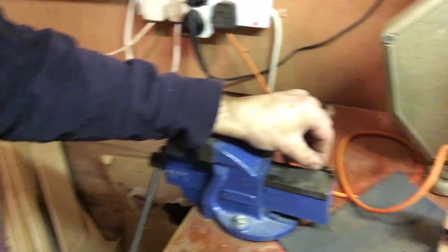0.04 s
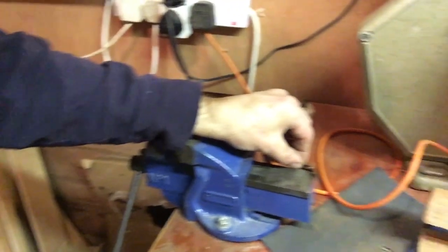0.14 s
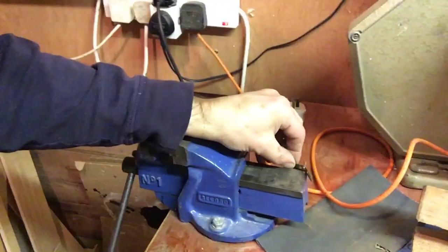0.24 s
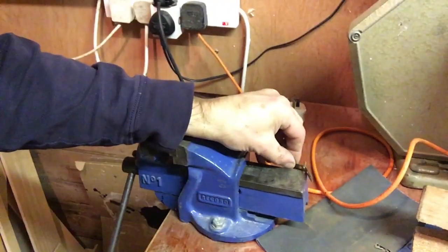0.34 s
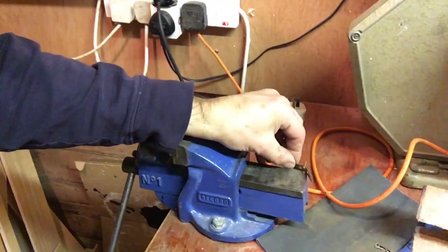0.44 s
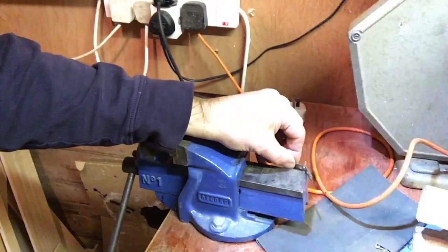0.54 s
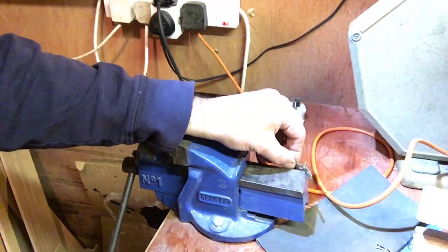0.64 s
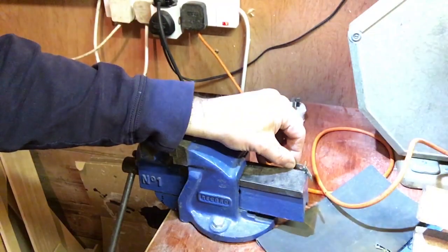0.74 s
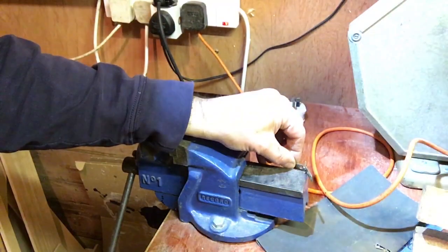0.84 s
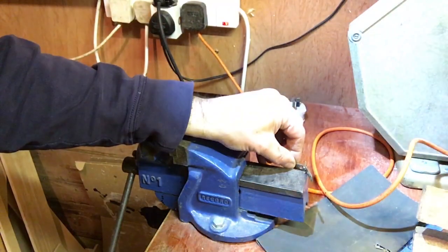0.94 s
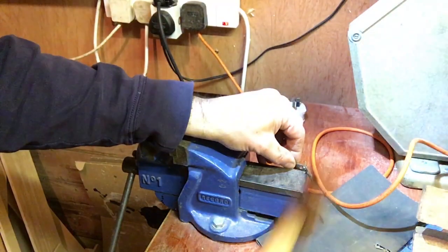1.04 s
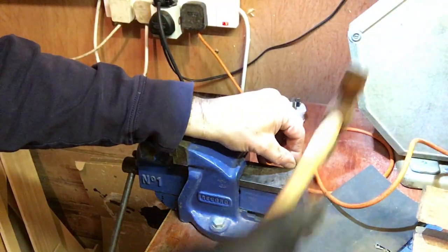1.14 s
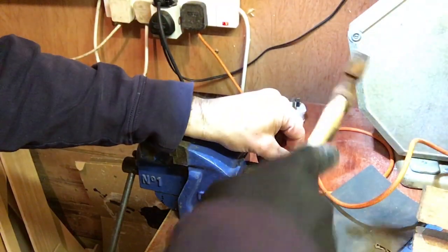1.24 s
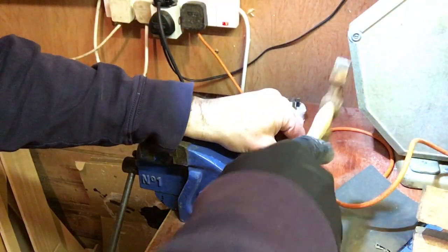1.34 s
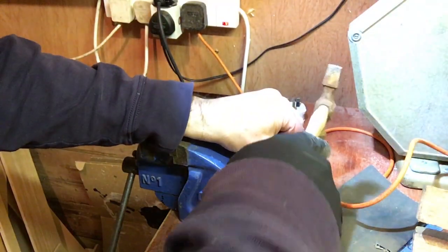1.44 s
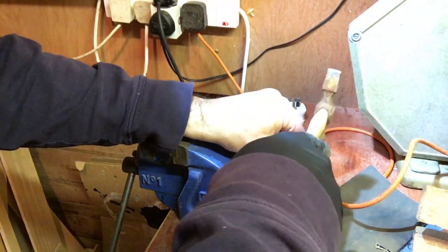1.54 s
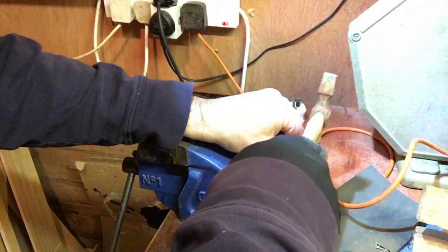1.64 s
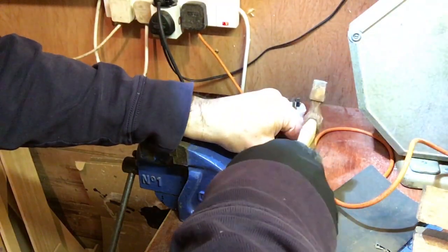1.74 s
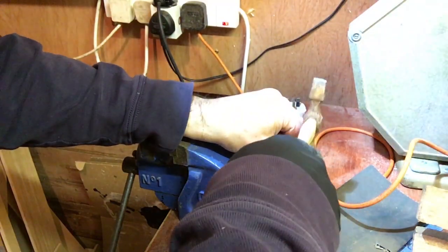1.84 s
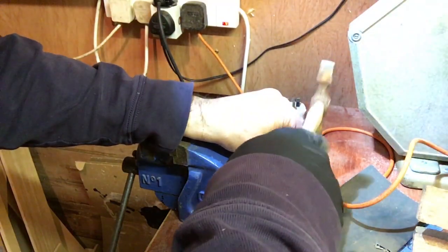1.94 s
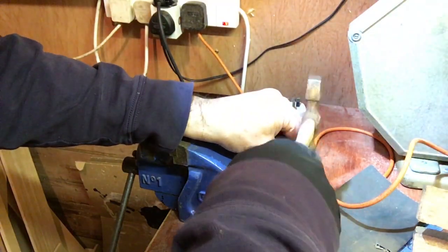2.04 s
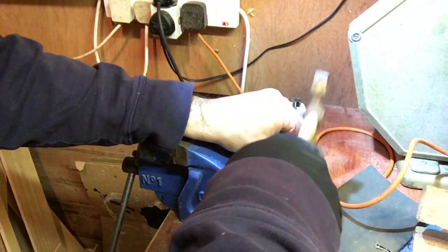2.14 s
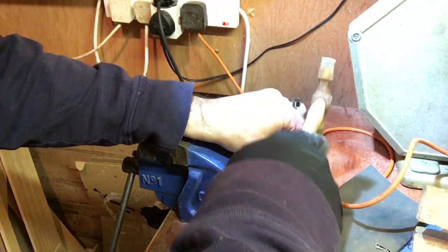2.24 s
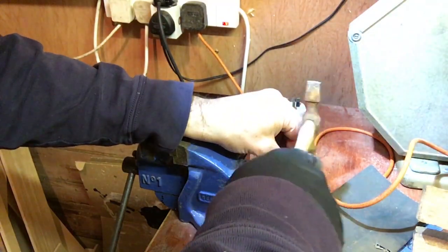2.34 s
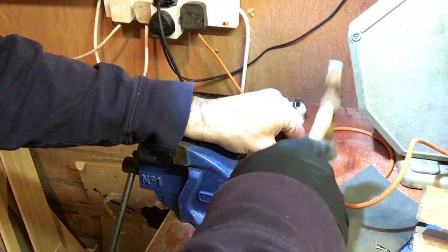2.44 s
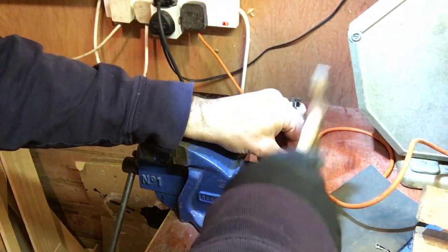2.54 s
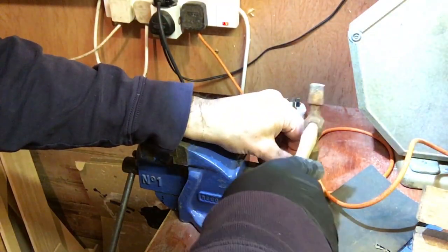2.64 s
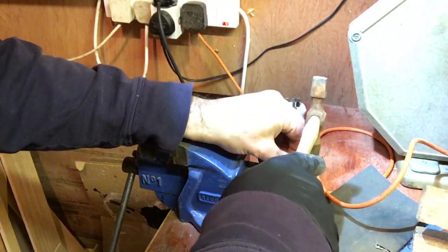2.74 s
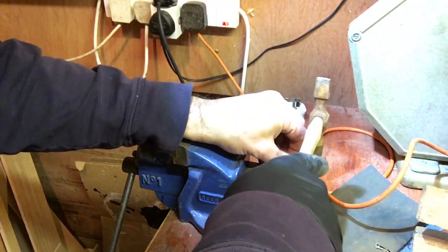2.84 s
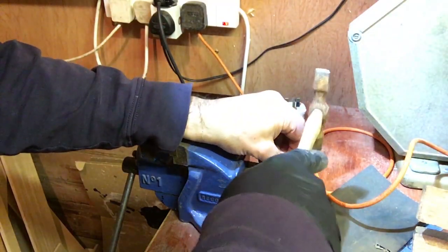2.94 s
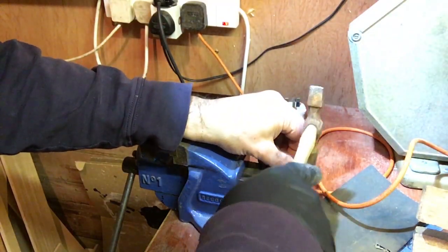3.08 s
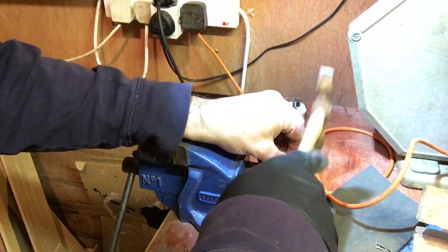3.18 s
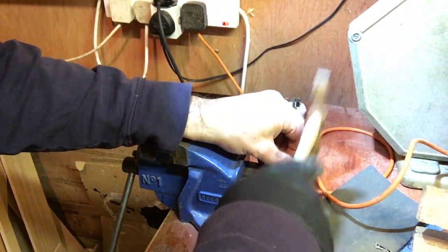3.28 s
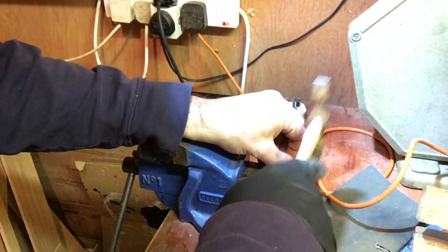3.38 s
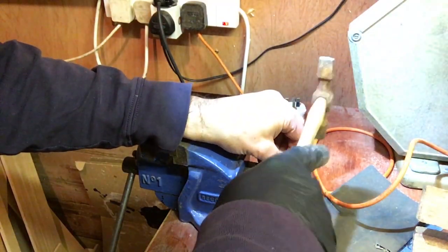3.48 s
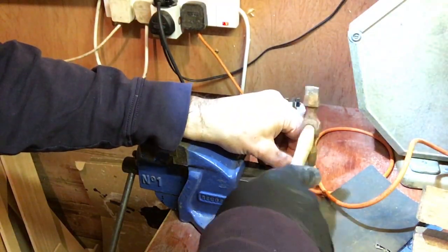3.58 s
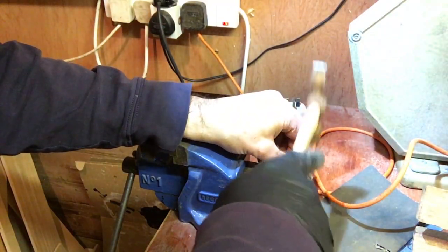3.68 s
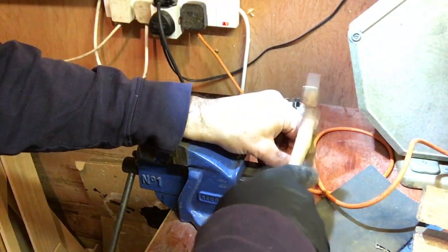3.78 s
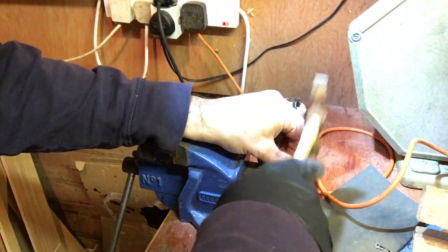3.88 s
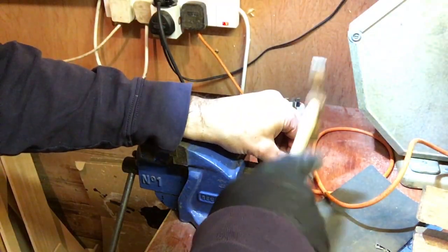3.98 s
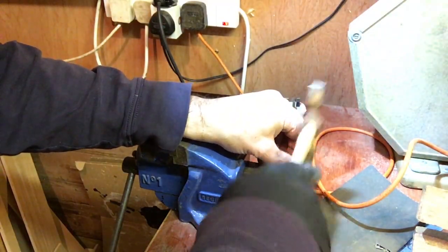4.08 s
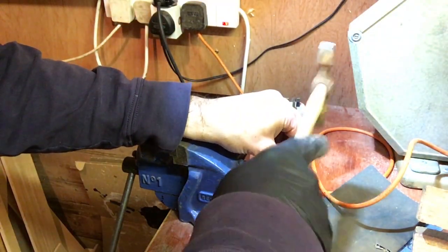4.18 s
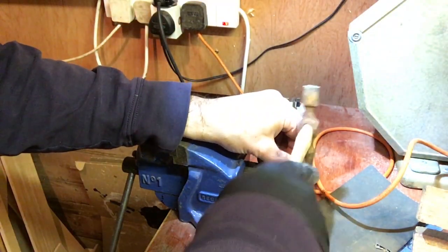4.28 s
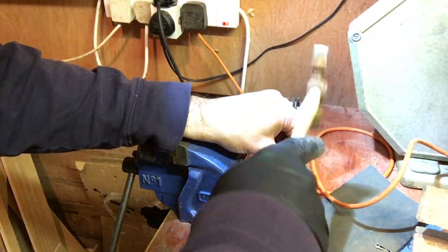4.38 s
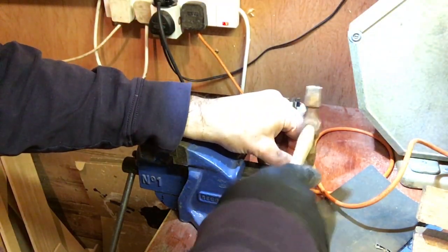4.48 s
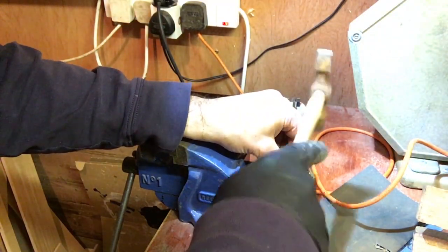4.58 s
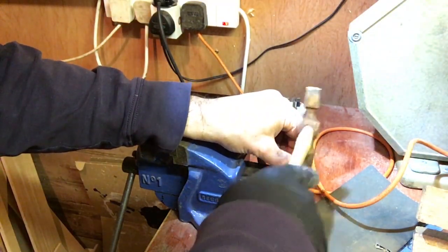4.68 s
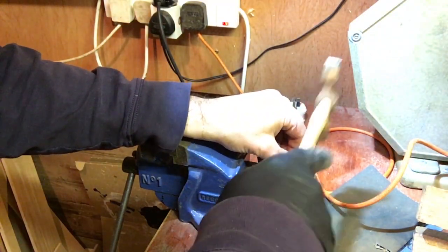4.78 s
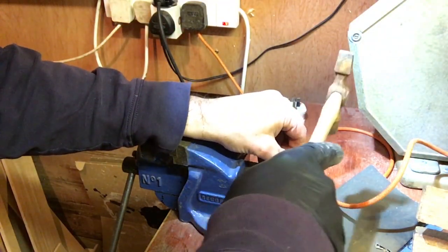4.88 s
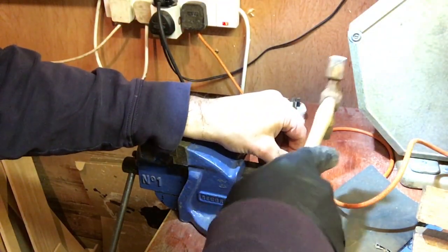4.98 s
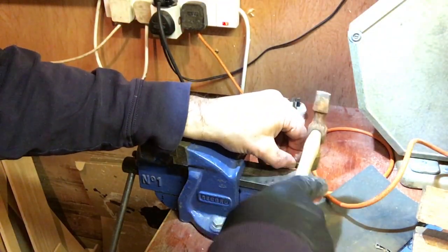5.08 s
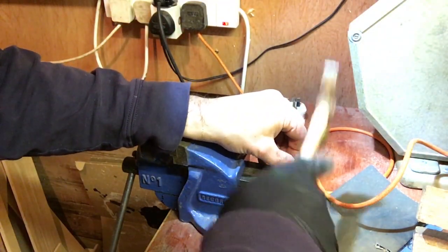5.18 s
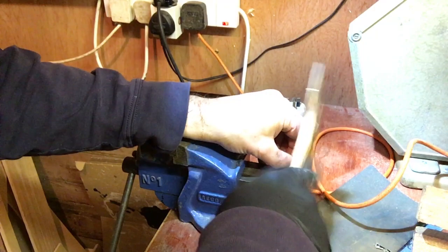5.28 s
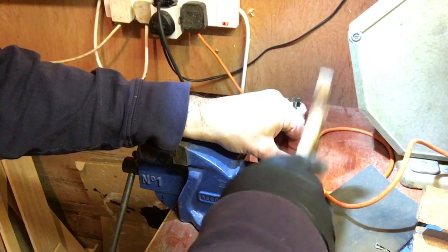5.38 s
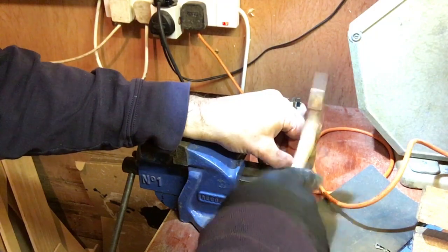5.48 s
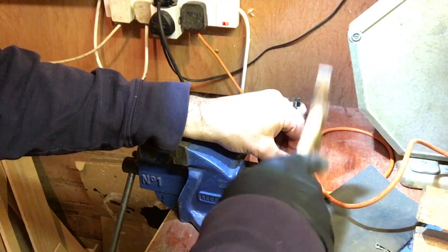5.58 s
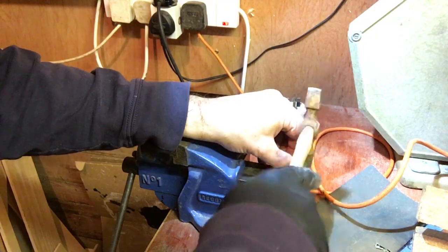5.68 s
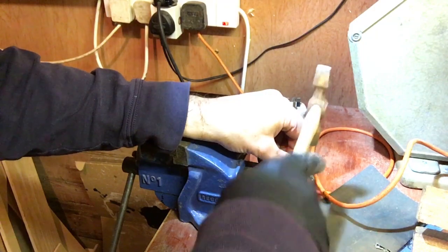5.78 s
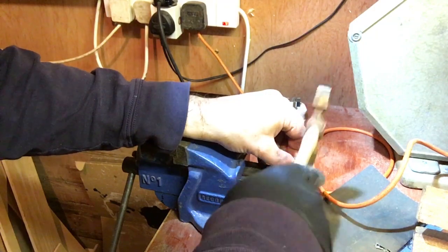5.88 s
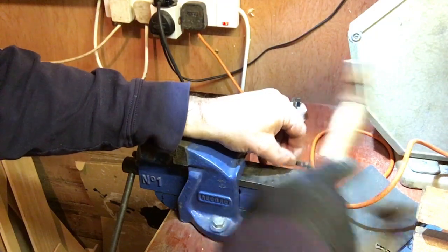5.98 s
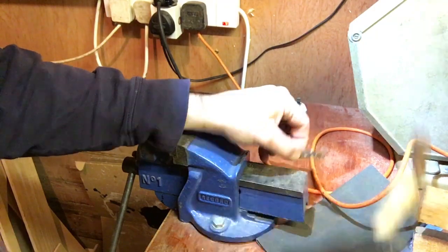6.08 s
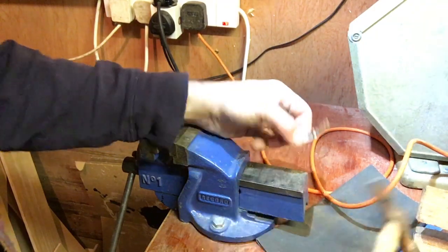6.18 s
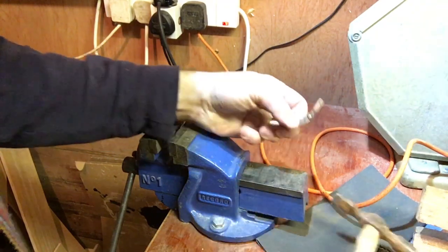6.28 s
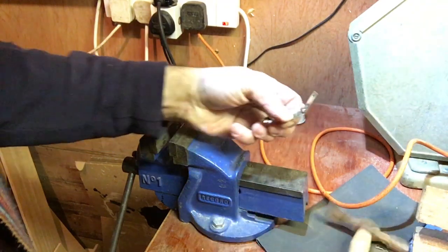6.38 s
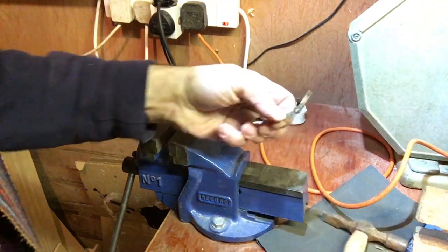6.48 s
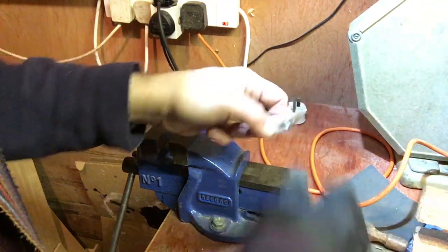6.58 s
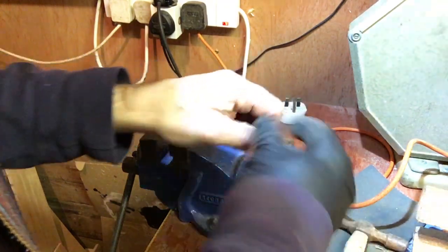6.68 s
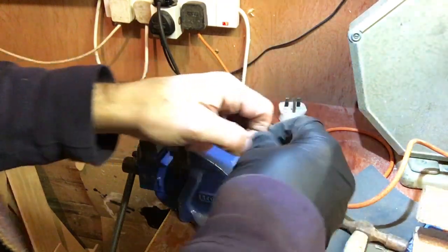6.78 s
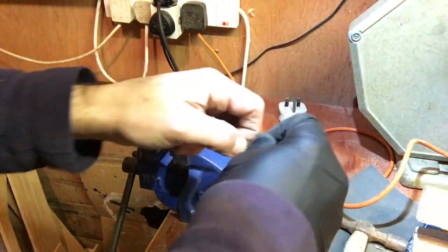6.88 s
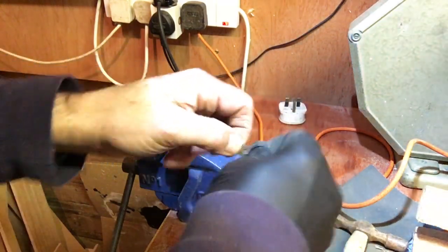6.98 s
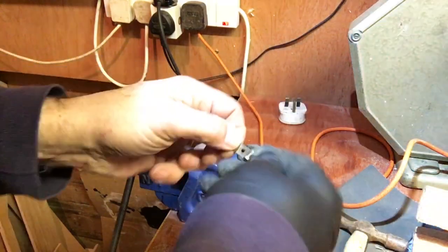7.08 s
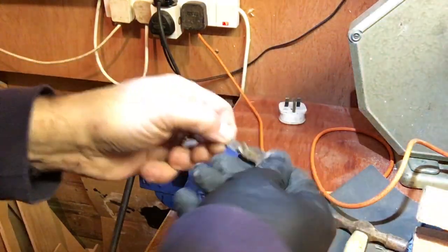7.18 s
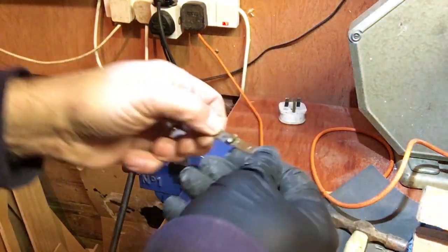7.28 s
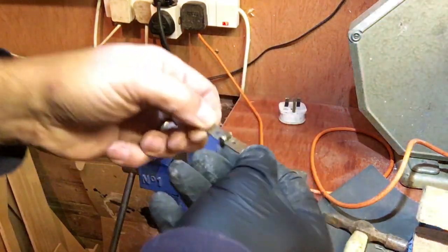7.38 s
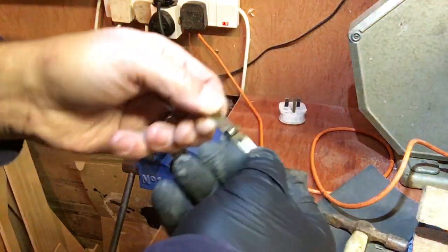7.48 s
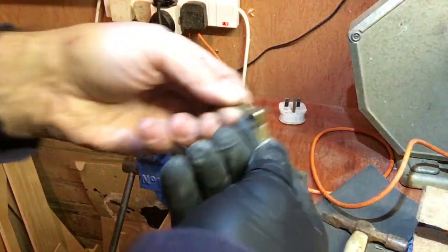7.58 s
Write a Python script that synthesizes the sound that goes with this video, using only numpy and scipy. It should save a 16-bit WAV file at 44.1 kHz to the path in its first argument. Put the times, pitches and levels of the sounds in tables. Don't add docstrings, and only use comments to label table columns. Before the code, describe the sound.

A small workshop heard close up, with a quiet low rumble and thin hiss throughout. From 0 to 1.6 s only soft sleeve and glove rustle, with a small loose tick at 1.2 s. A very light tap at 1.7 s begins the hammering on a brass pin in a cast vise: uneven, moderate taps to about 3.1 s, a couple with a brighter brassy tick, then loud blows from 3.3 s, four or five a second, with a short gap before 5.1 s and the last at 5.85 s. Each is a hard, dry mid-pitched clank with short ring, woody bench body, low leg thump and tight room reflection, loudest ones squashed. At 6.4 s the dropped hammer knocks on the bench, bounces, rattles and hisses to rest by 6.6 s. Faint rustle, bright ticks and a soft low knock continue to 7.6 s.

```python
import sys
import numpy as np
from scipy import signal
from scipy.io import wavfile
from scipy.ndimage import uniform_filter1d

SR = 44100
rng = np.random.default_rng(int(sys.argv[2]) if len(sys.argv) > 2 else 0)


def natural_amplitude(level_db):
    exponent = np.asarray(level_db, float) / 20
    return 10 ** exponent


def to_wav(s):
    ch = np.atleast_2d(s).T
    pcm = np.round(np.clip(ch, -1, 1) * 32767)
    wavfile.write(sys.argv[1], SR, pcm.astype(np.int16))


N = 336232

TAPS = [(1.727, -23.5, -35, -33.5, -69), (2.04, -8.5, -15, -30.5, -45.5), (2.306, -13, -20, -40, -50.5),
        (2.564, -17.5, -13, -15, -31.5), (3.042, -18.5, -20, -15, -27), (3.297, -5, -19.5, -35, -45),
        (3.545, 2, -17.5, -28.5, -36.5), (3.779, 2.5, -13.5, -27.5, -45), (4.009, 3, -13.5, -29, -38.5),
        (4.226, 1.5, -11.5, -22.5, -38), (4.438, 2, -13, -23.5, -44), (4.628, -4.5, -12, -24.5, -34),
        (5.096, -4, -17, -28.5, -37), (5.316, 3.5, -14, -24, -49.5), (5.507, 2, -10.5, -19, -37),
        (5.688, 0.5, -9, -17, -37.5), (5.843, -1, -10.5, -17.5, -38)]
BOUNCES = [
    (6.375, -10.5, 1.5, -21, -26),
    (6.436, 5.5, -15.5, -19.5, -37.5),
    (6.515, -12.5, -3.5, -14, -23.5),
    (6.553, -18.5, -2, -1, -44),
    (6.585, -14, -5, -19, -54),
    (6.595, -23, -26, -7, -67),
]
# [t/s, peak level/dB, low edge f/Hz, high edge f/Hz]
TICKS = [
    (1.228, -38.5, 900, 7040),
    (6.298, -52.5, 250, 445),
    (6.373, -28, 5000, 24000),
    (6.53, -49, 4630, 10190),
    (6.716, -46, 900, 2590),
    (6.833, -38.5, 4200, 8100),
    (6.993, -48, 4800, 7600),
    (7.483, -53.5, 2200, 3880),
    (7.537, -39.5, 250, 1300),
]
COLOUR_HZ = [400, 1300, 2900, 5800, 13000]
# thud, body, clank, tick, ping [level/dB]
USUAL_COLOUR_DB = [-13, 0.5, -15, -21, -45.5]

VISE_ON_PLANK_MODES = [(252, -3.5, .29), (236, -12, .2),
                       (177, -9, 0.073), (285.5, -10, 0.16), (314, -9, 0.14), (384, -8.5, .13), (445.2, -4.5, 0.2),
              (641, -4.5, .16), (661, -11.5, 0.17), (701.7, -9.5, .1), (780, -3, 0.092), (1000, -4, 0.1),
              (1004.4, -6, .12), (1020, 2, 0.02),
                       (1200, -7, 0.11), (1210, -9, 0.025), (1439, -8.5, .1), (1367, -5, .12), (1465, -7.5, 0.071),
               (2077, -17.5, 0.24), (2430, -15.5, .1), (2830, -19, 0.027), (1500, -11, 0.063),
               (1830, -15.5, 0.067), (3175, -12.5, 0.096), (3780, -17.5, .1)]
JAW_MODES = [(2890, -7, .05), (2950, -3, .085), (3015, -5, .06), (3130, -5, .035), (3280, -5, .03)]
HEAD_MODES = [(4300, -24, .03), (4810, -23, .055), (5500, -28, .035), (5900, -24, .04), (6330, -23, .04),
              (6880, -31, .09), (7050, -32, .06), (8160, -38, .04), (11650, -41, .03), (12570, -39, .04),
              (13800, -41, .05), (14900, -44, .03)]
BENCH_MODES = [(350.7, -4, 0.07), (607, -6, 0.11), (790, -4, 0.057), (938, -11, 0.15), (1046, -10.5, 0.14),
               (1180, -12.5, 0.038), (1430, -0.5, 0.1), (1663, -4, 0.019), (2156, -1, 0.029),
               (2240, -8.5, .04), (2720, -8, 0.021), (2870, -16, 0.056), (3970, -18.5, .035),
               (4570, -14, .035), (6300, -17, 0.023)]
LEG_MODES = [(68.6, -12.5, 0.18), (83, -5, 0.1), (111.2, -5, .22), (141, -10.5, 0.084), (151.85, -8, 0.047)]
CASE_MODES = [(377, -58, .9), (614, -66, 1.5), (905, -64, .7), (940, -60, .8), (968, -62, .7),
              (1010, -63, .8), (1050, -65, .6), (1104, -70, 1.4)]

# [f/Hz, level/dB per Hz]
ANSWER = [(41, -38.5), (70, -15.5), (190, -15.5), (244, -6), (853, -2), (1370, 0.5), (1930, -10.5),
          (2980, -14.5), (3490, -19), (6160, -22.5), (7730, -31.5), (13000, -46), (16000, -56)]
# [f/Hz, t60/s]
DECAY = [(80, 0.28), (210, 0.22), (560, 0.2), (1470, 0.17), (3880, 0.16), (10200, 0.13)]
# [middle t/s, length/s, level/dB, centre f/Hz, fall/dB per octave off centre]
RUBS = [(0.088, 0.55, -56.5, 560, 15), (.14, .3, -59, 179, 19), (0.222, 0.052, -65, 5500, 14),
        (0.357, .12, -57, 4500, 16), (.52, 0.29, -63.5, 1570, 6), (0.703, .08, -67, 6000, 3),
        (0.444, 2.3, -74, 3000, 1), (0.88, 0.32, -63.5, 3640, 4.5), (0.987, 0.077, -64, 6500, 6),
        (1.094, 0.47, -64.5, 2200, 2), (1.3, 0.77, -69.5, 2960, 2.5), (6.193, 0.17, -74.5, 5000, 4.5),
        (6.3, 0.48, -72, 1800, 2), (6.739, .09, -59, 5820, 6.5), (6.71, 0.16, -53.5, 317, 5.5),
        (6.85, .1, -66, 6200, 0), (6.995, 0.046, -59, 6030, 9), (7.163, 0.23, -56, 5570, 3.5),
        (7.05, 0.99, -70, 2500, 2.5), (7.16, 1.42, -65, 282, 9), (7.353, 0.52, -67, 2450, 2.5),
        (7.507, 0.075, -60, 1200, 5.5), (7.557, 0.17, -51, 353, 4)]
# [f/Hz, level/dB per Hz]
CLOTH = [(250, 5.5), (600, -1.5), (1600, -5), (3500, -3.5), (7000, -7.5), (10300, -12), (12000, -10.5),
         (16000, -12)]
# [f/Hz, level/dB per Hz]
RUMBLE = [(25, -22.5), (45, -9.5), (64, 0.5), (100, -9.5), (200, -16.5), (400, -24), (1000, -28.5),
          (3000, -35), (8000, -41.5), (15000, -57.5)]

THUD_DB, THUD_FOLLOWS, THUD_LOST_TO_TICK = -19, 0.44, 0.26
THUD_MOST_DB = -3
LEG_DB, LEG_FOLLOWS = -24.5, 0.18
JAW_UNDER_CLANK_DB, JAW_LOST_TO_TICK = -13.5, 0.3
PIN_UNDER_TICK_DB, PIN_LOW_HZ, PIN_HIGH_HZ, PIN_T60_S = -12, 4000, 5440, 0.045
BOUNCE_PING_DB, BOUNCE_LEG_DB, WOOD_CONTACT_HZ = -58, -53, 4500
BLOW_EDGE_HZ, ABOVE_DB = 7250, -6
SLIDE_DB, SLIDE_T60_S, SLIDE_STOPS_S = -58.5, 0.45, 6.495
RUMBLE_DB = -66
CEILING = 0.72


def rms_one(x):
    return x / np.sqrt(np.mean(x ** 2) + 1e-20)


def at_hz(points, hz):
    table = np.array(points)
    return np.interp(np.log(hz), np.log(table[:, 0]), table[:, 1])


def drift(rate_hz):
    steps = rng.standard_normal(400)
    return np.interp(np.arange(N) / SR * np.clip(rate_hz, 0.1, 50), np.arange(400), steps)


def band(x, low_hz, high_hz):
    sos = signal.butter(2, [low_hz, min(high_hz, 0.48 * SR)], "band", fs=SR, output="sos")
    return signal.sosfilt(sos, x)


def noise_bank(size):
    edges = 22 * 2 ** (np.arange(30) / 3)
    white = rng.standard_normal((2, size + 4000))
    bands = [band(white[k % 2], edges[k], edges[k + 1])[4000:] for k in range(29)]
    return np.array(bands), np.sqrt(edges[1:] * edges[:-1])


def click_train(times_s, db):
    clicks = np.zeros(N)
    clicks[np.round(np.asarray(times_s) * SR).astype(int)] = natural_amplitude(db)
    return clicks


def ring(clicks, hz, t60_s):
    r, w = natural_amplitude(-60 / (t60_s * SR)), 2 * np.pi * hz / SR
    return signal.lfilter([0, np.sin(w)], [1, -2 * r * np.cos(w), r * r], clicks + 1e-18)


def tap_colours():
    s, db, clank, tick, ping = np.transpose(TAPS)
    thud = THUD_DB + (THUD_FOLLOWS - 1) * db - THUD_LOST_TO_TICK * tick
    return np.transpose([s, db, np.minimum(thud, THUD_MOST_DB), clank, tick, ping])


def bounce_colours():
    return np.insert(np.array(BOUNCES), len(BOUNCES[0]), BOUNCE_PING_DB, axis=1)


def blow_db(rows, hz):
    rows = np.array(rows)
    colour = np.insert(rows[:, 2:], 1, 0, axis=1) - USUAL_COLOUR_DB
    offset_db = np.array([at_hz(np.transpose([COLOUR_HZ, c]), hz).T for c in colour]).T
    return rows[:, 1] + offset_db


def struck(rows, modes, level_db, spread_db, damping):
    at, out = [round(row[0] * SR) for row in rows], np.zeros(N)
    chance = rng.standard_normal((len(rows), len(modes)))
    signs = rng.choice([-1, 1], len(modes))
    for k, (hz, mode_db, t60_s) in enumerate(modes):
        clicks = np.zeros(N)
        click_db = blow_db(rows, hz) + mode_db + level_db + spread_db * chance[:, k]
        clicks[at] = signs[k] * natural_amplitude(click_db)
        out += ring(clicks, hz, damping * t60_s)
    return out


def jaw_and_pin():
    s, db, clank, tick = np.transpose(TAPS)[:4]
    out = np.zeros(N)
    jaw_db = db + clank - JAW_LOST_TO_TICK * tick + JAW_UNDER_CLANK_DB
    for hz, mode_db, t60_s in JAW_MODES:
        clicks = click_train(s, jaw_db + mode_db + 3 * rng.standard_normal(len(s)))
        out += ring(clicks, hz, t60_s)
    t = np.arange(SR // 8) / SR
    starts = np.round(s * SR).astype(int)
    pin_hz = rng.uniform(PIN_LOW_HZ, PIN_HIGH_HZ, len(s))
    for at, hz, pin_db in zip(starts, pin_hz, db + tick + PIN_UNDER_TICK_DB):
        out[at:at + len(t)] += natural_amplitude(pin_db - 60 * t / PIN_T60_S) * np.sin(2 * np.pi * hz * t)
    return out


def near_walls(x, bank, hz, echo_db, share):
    t = np.arange(SR // 3) / SR
    fall = natural_amplitude(-60 * t / (share * at_hz(DECAY, hz)[:, None]))
    echoes = np.sum(bank[:, -len(t):] * fall, axis=0) * (t > 0.0015)
    return x + natural_amplitude(echo_db) * signal.oaconvolve(x, echoes / np.linalg.norm(echoes))[:N]


def diffuse(rows, bank, hz, level_db, alike, early_db, early_share, crack_db, rise_cycles):
    size, out = SR // 2, np.zeros(N + SR)
    t, t60_s = np.arange(size) / SR, at_hz(DECAY, hz)[:, None]
    fall = natural_amplitude(-60 * t / t60_s)
    fall = fall + natural_amplitude(early_db - 60 * t / (early_share * t60_s))
    fall = fall + natural_amplitude(crack_db - 60 * t / 0.004)
    fall = fall * (1 - np.exp(-t * hz[:, None] / rise_cycles))
    alike = np.clip(alike, 0, 1)
    starts = rng.integers(size, bank.shape[1] - size, len(rows))
    hit_db = blow_db(rows, hz[:, None]).reshape(len(hz), -1)
    gains = natural_amplitude(hit_db + at_hz(ANSWER, hz)[:, None] + level_db)
    for k, row in enumerate(rows):
        own = bank[:, starts[k]:starts[k] + size]
        pattern = alike * bank[:, :size] + np.sqrt(1 - alike ** 2) * own
        at = round(row[0] * SR)
        out[at:at + size] += gains[:, k] @ (pattern * fall)
    return out[:N]


def thumps():
    s, db = np.transpose(TAPS)[:2]
    clicks = click_train(s, LEG_DB + LEG_FOLLOWS * db)
    clicks += click_train(np.transpose(BOUNCES)[0][:2], BOUNCE_LEG_DB)
    push, out = band(clicks, 40, 280), np.zeros(N)
    for k, (hz, mode_db, t60_s) in enumerate(LEG_MODES):
        out += (-1) ** k * natural_amplitude(mode_db) * ring(push, hz, t60_s)
    return natural_amplitude(4) * out


def slide():
    t = np.arange(N) / SR
    first_s, second_s = BOUNCES[0][0], BOUNCES[1][0]
    hiss = rms_one(band(rng.standard_normal(N), 3000, 15000))
    since = np.where(t > second_s, t - second_s, t - first_s)
    stop = np.clip((SLIDE_STOPS_S - t) / 0.02, 0, 1) ** 2
    return hiss * (since > 0) * stop * natural_amplitude(SLIDE_DB - 60 * np.abs(since) / SLIDE_T60_S)


def ticks():
    out, t = np.zeros(N + SR), np.arange(SR // 10) / SR
    for s, peak_db, low_hz, high_hz in TICKS:
        envelope = natural_amplitude(-60 * t * high_hz / 30) + natural_amplitude(-26.5 - 60 * t / 0.28)
        puff = rng.standard_normal(len(t)) * envelope
        puff = band(band(puff, low_hz, high_hz), low_hz, high_hz)
        at = round(s * SR)
        out[at:at + len(t)] += natural_amplitude(peak_db) * puff / np.abs(puff).max()
    return out[:N]


def rustle():
    t, out = np.arange(0, N + 64, 64) / SR, 0
    s, length_s, db, centre_hz, fall_db = np.transpose(RUBS)
    phase = np.clip((t[:, None] - s) / length_s, -0.5, 0.5)
    swell = np.abs(np.cos(np.pi * phase)) ** 3.4
    slip_db = 5.0 * np.minimum(rng.exponential(1, (2, N)), 3.5)
    slips = (rng.random((2, N)) < 2500 / SR) * natural_amplitude(slip_db)
    fibres = rms_one(rng.standard_normal((2, N)) * (1 + 0.83 * slips))
    edges = 180 * 2 ** np.arange(0, 7.1, 0.5)
    for k, (low_hz, high_hz) in enumerate(zip(edges[:-2], edges[1:])):
        hz = np.sqrt(low_hz * high_hz)
        rub_db = db - fall_db * np.abs(np.log2(hz / centre_hz))
        gain = np.sqrt(swell @ natural_amplitude(2 * rub_db))
        flutter = np.interp(t * 30, np.arange(400), rng.standard_normal(400))
        gain = gain * natural_amplitude(at_hz(CLOTH, hz) + 10 + 5.1 * flutter)
        out = out + band(fibres[k % 2], low_hz, high_hz) * np.interp(np.arange(N) / SR, t, gain)
    return out


def rumble(bank, hz):
    gains = natural_amplitude(at_hz(RUMBLE, hz))
    return natural_amplitude(RUMBLE_DB + 2.0 * drift(28)) * rms_one(gains @ bank)


def scene():
    bank, hz = noise_bank(N)
    hits, falls = tap_colours(), bounce_colours()
    rings = struck(hits, VISE_ON_PLANK_MODES, level_db=-15.5, spread_db=3.0, damping=0.63)
    rings += struck(hits, HEAD_MODES, level_db=-9.5, spread_db=6.0, damping=1)
    bench = struck(falls, BENCH_MODES, level_db=-14.0, spread_db=0.0, damping=0.5)
    rings += band(bench, 60, WOOD_CONTACT_HZ)
    rings += jaw_and_pin()
    rings = near_walls(rings, bank, hz, echo_db=1.0, share=0.89)
    rings += struck(hits, CASE_MODES, level_db=1.5, spread_db=-0.5, damping=1.0)
    taps = diffuse(hits, bank, hz, level_db=1.0, alike=0.82, early_db=6.5, early_share=0.31,
                   crack_db=6.5, rise_cycles=1.0)
    drop = diffuse(falls, bank[:, SR:], hz, level_db=-9, alike=0.49, early_db=7.5, early_share=0.3,
                   crack_db=-5, rise_cycles=0.98)
    legs_excluded = signal.butter(4, 115, "high", fs=SR, output="sos")
    blows = signal.sosfilt(legs_excluded, rings + taps + drop)
    body = signal.sosfiltfilt(signal.butter(8, BLOW_EDGE_HZ, fs=SR, output="sos"), blows)
    blows = body + natural_amplitude(ABOVE_DB) * (blows - body)
    return (blows + thumps() + slide() + ticks() + rustle() + rumble(bank, hz))[None]


def low_pass(x):
    return signal.sosfilt(signal.butter(12, 16650, fs=SR, output="sos"), x)


def record(dry):
    x = dry[0]
    level_db = 20 * np.log10(np.abs(x) + 1e-9)
    over_db = np.maximum(level_db - 20 * np.log10(1.14 * CEILING), 0)
    ramp_db = 400 * np.arange(N) / SR
    held_db = np.maximum(np.maximum.accumulate(over_db + ramp_db) - ramp_db, 0)
    x = x * natural_amplitude(-uniform_filter1d(held_db, size=40))
    x = x / (1 + (x / CEILING) ** 6) ** (1 / 6)
    x = x + 0.07 * band(x ** 4, 18, 45)
    return low_pass(x)


dry = scene()
out = record(dry)
to_wav(out)
```